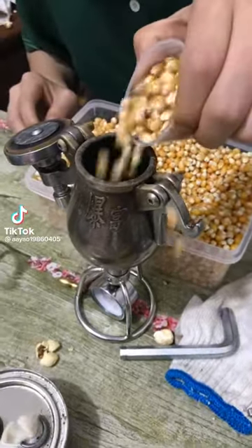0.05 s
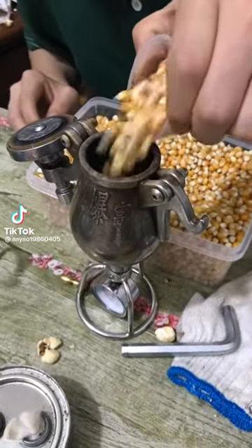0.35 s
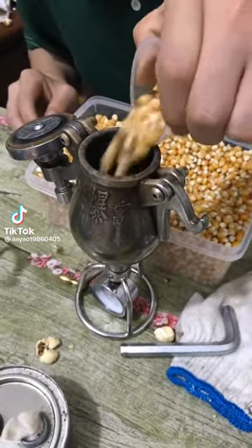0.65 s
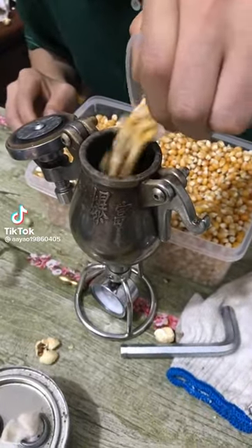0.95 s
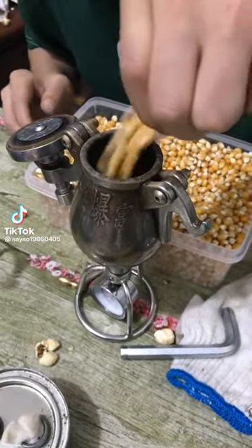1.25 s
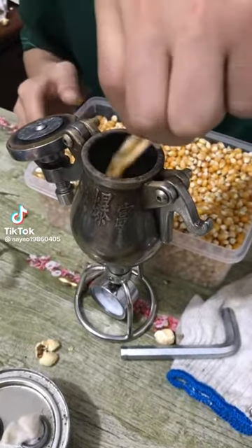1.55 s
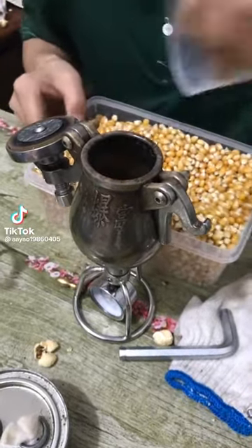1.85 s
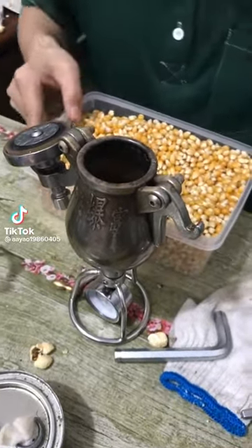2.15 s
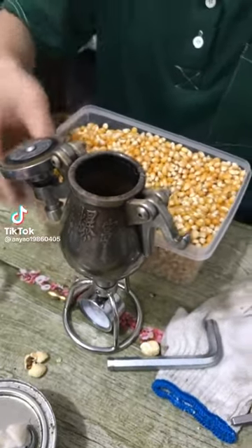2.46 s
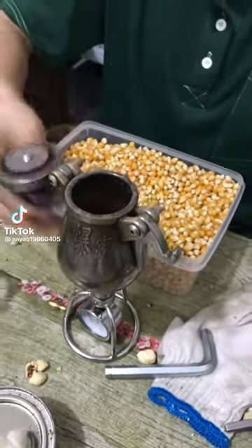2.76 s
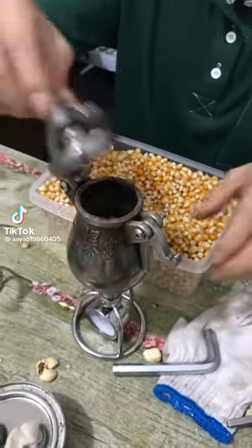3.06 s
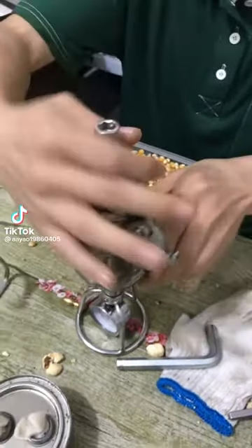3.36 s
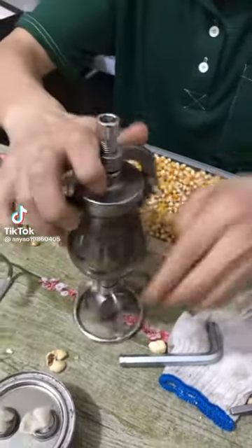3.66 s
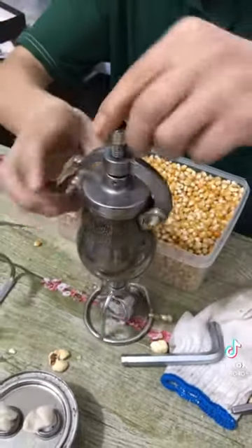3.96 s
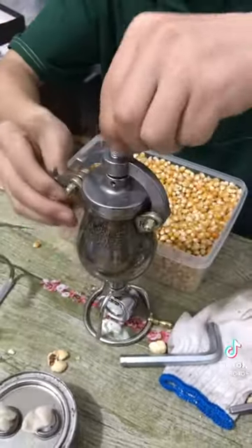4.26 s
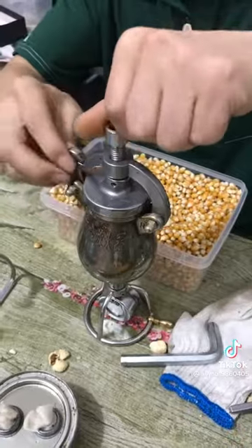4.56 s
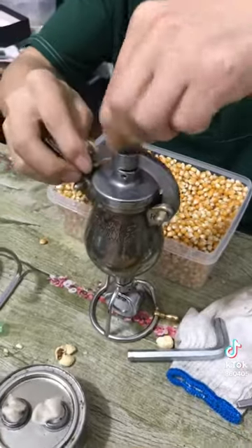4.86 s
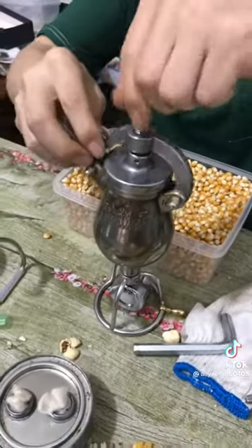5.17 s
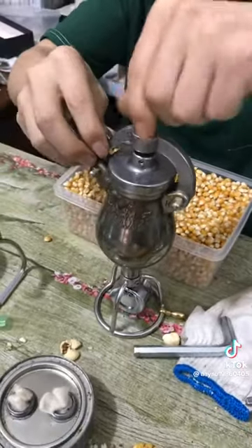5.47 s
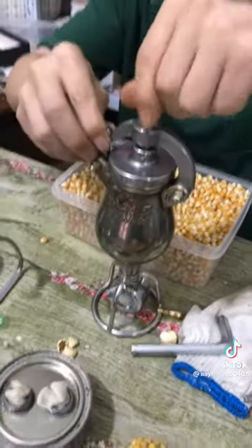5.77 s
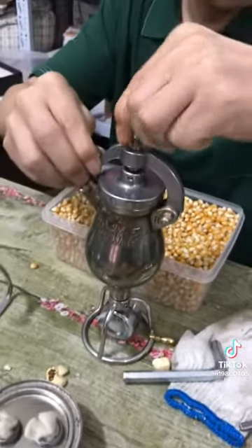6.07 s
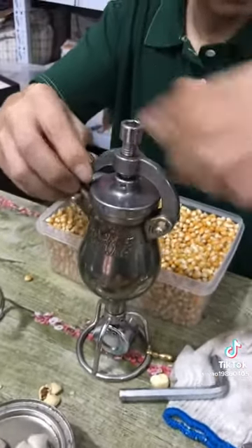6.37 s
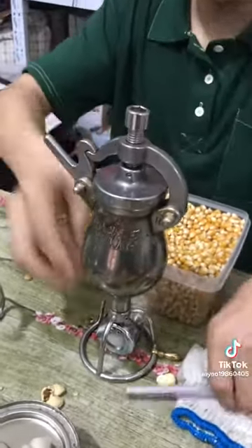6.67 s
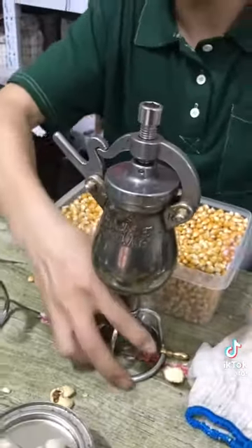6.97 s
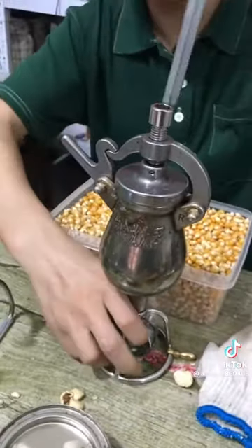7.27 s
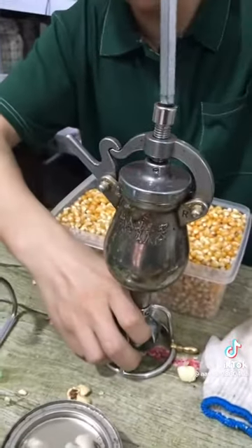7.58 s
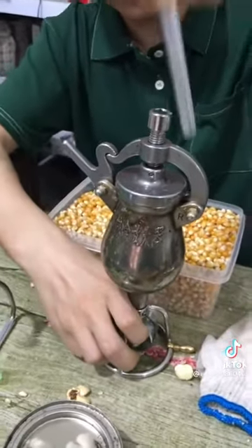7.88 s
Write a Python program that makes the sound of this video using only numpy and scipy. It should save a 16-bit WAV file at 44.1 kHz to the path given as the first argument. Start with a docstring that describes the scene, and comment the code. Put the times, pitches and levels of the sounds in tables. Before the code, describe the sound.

Dry corn kernels rattle into a small metal pot, then a scoop clatters down and a metal lid is clamped with clicks and scrapes.

```python
"""Corn pours from a scoop into a small cast-metal popping pot on a wooden table, in a small room.
Thousands of random impacts merge into a rattle that dulls as the heap grows. The scoop clatters down,
the hinged lid is swung shut and clamped, and its screw is run down by hand with a stick-slip rasp.
A steel hex key knocks on the table as it is picked up, and is worked into the screw head. Each blow
is a brief crack plus the struck body's damped modes; room air and a low mains hum lie under it all."""
import sys
import numpy as np
from scipy import signal
from scipy.fft import rfft, irfft
from scipy.io import wavfile

SR = 44100
rng = np.random.default_rng(int(sys.argv[2]) if len(sys.argv) > 2 else 0)


def wrap_up_sound(samples):
    """Save the sound to the file named by the first command line argument, as 16-bit audio."""
    columns = np.atleast_2d(samples).T
    # keep every value between -1 and 1, then stretch to whole-number steps
    tamed = np.clip(columns, -1, 1)
    steps = np.round(tamed * 32767).astype(np.int16)
    wavfile.write(sys.argv[1], SR, steps)


N = 349713
T = np.arange(N) / SR

# Spectrum of a small impact on the pot. Each row: frequency in Hz, spectral level in dB.
POT_IMPACT_TONE = [(76, -38.5), (130, -18), (400, -10), (638, -14), (1520, 3.5), (4150, -1), (4980, -6),
                   (6090, -0.5), (11800, -15.5), (16000, -41)]
# Modes of the pot and of its clamp. Each row: frequency in Hz, level in dB, T60 in seconds.
POT_MODES = [(1443, -1, 0.22), (2027, -3, 0.23), (3330, 13, 0.033), (4750, -13, 0.33), (5250, -4, 0.073),
             (8200, -15, 0.051), (11500, -18, .08)]
CLAMP_MODES = [(1126, -3.5, 0.16), (1170, -4.5, 0.18), (1844, 2.5, 0.11), (3064, -14.5, 0.17),
               (4580, 3.5, 0.053), (4565, -5, 0.15), (4650, 0.5, 0.055), (5540, 5, 0.032),
               (7180, -11.5, 0.042), (8860, -13.5, 0.084), (9720, -19.5, .07), (15100, -21, 0.055)]


def from_db(db):
    """Decibels to amplitude ratio."""
    return 10 ** (np.asarray(db) / 20)


def rms(x):
    """Root mean square."""
    return np.sqrt(np.mean(x ** 2) + 1e-20)


def at_hz(points, hz):
    """Interpolation on a log-frequency axis."""
    f, value = np.transpose(points)
    return np.interp(np.log(hz + 1e-9), np.log(f), value)


def band(x, low, high):
    """Causal band-pass filter."""
    return signal.sosfilt(signal.butter(3, [low, min(high, .48 * SR)], "band", fs=SR, output="sos"), x)


def colour(x, tone, size=4096):
    """Minimum-phase filtering imposes a spectrum with no sound ahead of its cause."""
    cepstrum = irfft(np.log(from_db(at_hz(tone, np.fft.rfftfreq(size, 1 / SR)))))
    cepstrum[1:size // 2] *= 2
    cepstrum[size // 2 + 1:] = 0
    return signal.oaconvolve(x, irfft(np.exp(rfft(cepstrum))))[:len(x)]


def decay(t, t60):
    """Exponential decay of 60 dB in t60 seconds."""
    return np.exp(-np.log(1000) * t / t60)


def wander(per_s):
    """Random modulation: ramps between Gaussian values."""
    knots = np.arange(0, T[-1] + 1, 1 / per_s)
    return np.interp(T, knots, rng.standard_normal(len(knots)))


def grains(per_s, spread_db=2.5):
    """Shot noise: random impulses of uneven size, with mean power independent of rate."""
    chance = per_s / SR
    at = np.flatnonzero(rng.random(N) < chance)
    sizes = from_db(spread_db * np.minimum(rng.exponential(1, len(at)), 3))
    clicks = np.zeros(N)
    clicks[at] = sizes * rng.choice([-1, 1], len(at))
    return clicks / np.sqrt(chance)


def ringing(modes, t, spread_db, detune):
    """Modal superposition: the contact point weights the modes, and the grip detunes them."""
    hz, db, t60 = np.transpose(modes)[:, :, None]
    strength = from_db(db + spread_db * rng.standard_normal(hz.shape))
    hz = hz * (1 + detune * rng.standard_normal(hz.shape))
    polarity = rng.choice([-1, 1], hz.shape)
    return np.sum(strength * polarity * np.sin(2 * np.pi * hz * t) * decay(t, t60), axis=0)


def impacts(rows, tone, modes, bass_db, crack_t60, ring_db, rise_s,
            edges_hz=(130, 700, 3000, 15000), attack_s=0.011):
    """Impulse response: a crack plus free vibration. Bass and brightness are relative to the mid band."""
    t = np.arange(SR // 4) / SR
    attack = int(attack_s * SR)
    swell = 1 - np.exp(-t / rise_s)   # the blow takes a moment to spread through the body
    out = np.zeros(N + len(t))
    for start_s, level_db, bright_db in rows:
        crack = colour(rng.standard_normal(len(t)) * swell * decay(t, crack_t60), tone)
        ring = swell * ringing(modes, t, spread_db=3, detune=.01)
        blow = crack / rms(crack[:attack]) + from_db(ring_db) * ring / rms(ring[:attack])
        at = int(start_s * SR)
        levels_db = level_db + bass_db, level_db, level_db + bright_db
        for low, high, db in zip(edges_hz, edges_hz[1:], levels_db):
            part = band(blow, low, high)
            out[at:at + len(t)] += from_db(db) * part / rms(part[:attack])
    return out[:N]


def stroke_envelope(rows, fade_t60):
    """Friction noise follows sliding speed: each stroke swells to a peak, then dies away."""
    return sum(from_db(db) * decay(np.abs(T - peak_s), np.where(T < peak_s, swell_s, fade_t60))
               for peak_s, db, swell_s in rows)


def friction(rows, tone, modes, ring_db, fade_t60):
    """Stick-slip friction: spurts of tiny slips rasp and drive the body's modes."""
    slips = grains(2000) * from_db(4 * wander(110))
    rasp = colour(slips, tone)
    body = ringing(modes, np.arange(SR // 3) / SR, spread_db=1, detune=0)
    ring = signal.oaconvolve(rasp, body)[:N]
    return stroke_envelope(rows, fade_t60) * (rasp / rms(rasp) + from_db(ring_db) * ring / rms(ring))


def corn_flow_db(stream_s=0.12, fullest_s=0.73, run_out_s=1.47):
    """Granular flow, in dB re its fullest: a thinning trickle, a growing stream, the scoop emptying."""
    tilt = np.clip((T - stream_s) / (fullest_s - stream_s), 0, 1)
    trickle_db = -6 - 60 * T
    stream_db = -4 * (1 - tilt)
    return np.where(T < stream_s, trickle_db, stream_db) - 102 * np.maximum(T - run_out_s, 0)


def collisions(per_s, t60, shapes):
    """A Poisson process of impacts, in which each kernel shape has its own click."""
    t = np.arange(SR // 20) / SR
    clicks = rng.standard_normal((shapes, len(t))) * decay(t, t60)
    hits = sum(signal.oaconvolve(grains(per_s / shapes), click)[:N] for click in clicks)
    return hits / rms(hits)


def pouring_corn(heap_from_s=.55, heap_grows_s=.55, bare_per_s=1100, heap_per_s=3000):
    """Dense impacts excite the pot; the growing heap damps the treble and strengthens the rattle."""
    # Spectra of the nearly empty and the filled pot. Each row: frequency in Hz, level in dB.
    empty_tone = [(200, -8.5), (520, -17), (870, -13.5), (1500, -2), (2000, -0.5), (2300, -6.5),
                  (4200, -1.5), (4950, -9.5), (5500, -1.5), (8000, -13), (12000, -19.5), (14000, -28),
                  (15100, -21)]
    full_tone = [(200, -13), (520, -22.5), (860, -24), (1070, -2.5), (1500, -7), (2080, -6.5), (2300, -12),
                 (3580, -4.5), (4950, -9.5), (5550, -1.5), (6640, -11), (10500, -21), (12200, -23),
                 (15500, -32)]
    flow_db = corn_flow_db()
    filled = np.clip((T - heap_from_s) / heap_grows_s, 0, 1)
    jostling = collisions(bare_per_s + (heap_per_s - bare_per_s) * filled, t60=0.014, shapes=5)
    bouncing = collisions(130, t60=.007, shapes=8)
    hits = jostling + from_db(-3) * bouncing
    empty, full = colour(hits, empty_tone), colour(hits, full_tone)
    rattle_db = -37 + flow_db + 2 * filled
    patter_db = -37 + 0.75 * flow_db - 3 * filled
    out = 0
    for low, high, db in ((150, 2600, rattle_db), (2600, 16000, patter_db)):
        early, late = band(empty, low, high), band(full, low, high)
        out += from_db(db) * ((1 - filled) * early / rms(early) + filled * late / rms(late))
    t = np.arange(SR // 4) / SR
    wall_modes = np.sin(2 * np.pi * 4690 * t) + from_db(-2) * np.sin(2 * np.pi * 5430 * t)
    wall = signal.oaconvolve(hits, wall_modes * decay(t, 0.087))[:N]
    return out + from_db(-50 + .5 * flow_db) * wall / rms(wall)


def air_and_hum(waver=.17, early_db=-3.5, steady_s=2.34, rise_s=1.0):
    """Broadband air noise and wavering mains harmonics; both come up a little as the pour ends."""
    # Air spectrum and hum partials. Each row: frequency in Hz, level in dB.
    air_tone = [(15, -29.5), (25, -17.5), (55, -8), (120, -27.5), (200, -25.5), (575, -38.5), (659, -35),
                (818, -36), (6560, -52), (16000, -70)]
    partials = [(49.9, -50), (150, -66.5)]
    air = colour(rng.standard_normal(N), air_tone)
    air = from_db(-53) * air / rms(band(air, 70, 16000))
    hum = sum(from_db(db) * np.sqrt(2) * np.sin(2 * np.pi * hz * T) for hz, db in partials)
    rise = from_db(early_db * np.clip((steady_s - T) / rise_s, 0, 1))
    return (air + hum * (1 + waver * wander(5.7))) * rise


def single_kernels():
    """Brief contacts of single kernels excite the pot's high modes."""
    # Each row: start in seconds, level in dB, brightness in dB.
    hits = [(0.1275, -28, 6), (0.193, -25, 4), (0.2394, -25.5, -10), (0.2833, -31, -6), (0.3177, -40, 5),
            (0.412, -27, 4), (0.4853, -34.5, 4), (0.5257, -42.5, 9.5), (0.5856, -47, 7),
            (0.6699, -29.5, 1.5), (1.836, -62.5, 7), (2.232, -44, -7)]
    return impacts(hits, POT_IMPACT_TONE, POT_MODES,
                   bass_db=-13.5, crack_t60=0.026, ring_db=-11.5, rise_s=0.00052)


def brushing_hands():
    """Friction of skin and sleeves: countless tiny slips sum to a soft rustle."""
    # Each row: peak time in seconds, level in dB, seconds to swell by 60 dB.
    strokes = [(1.96, -50.5, .6), (3.61, -48, 1.5), (3.98, -57, 0.39), (7.0, -58.5, 1)]
    # Each row: frequency in Hz, spectral level in dB.
    tone = [(240, -11), (500, -11), (1900, -11), (2700, -18.5), (3600, -18), (8500, -31), (15000, -45)]
    rustle = colour(grains(4500), tone)
    return stroke_envelope(strokes, fade_t60=1.3) * rustle / rms(rustle)


def falling_scoop():
    """Inelastic collisions: the scoop lands flat, bounces, tips over with a dry clack and skids."""
    # Each row: start in seconds, level in dB, brightness in dB.
    landing_hits = [(2.484, -11.5, -11.5), (2.5125, -16, -10), (2.579, -18.5, -7.5), (2.668, -28.5, -11.5),
                    (2.698, -17.5, -15.5), (2.7325, -19, -24), (2.756, -27.5, -8)]
    tipping_hits = [(2.825, -27, -9), (2.845, -29.5, -4), (2.869, -27.5, -6), (2.876, -20, -9),
                    (3.007, -40, -11)]
    # Each row: peak time in seconds, level in dB, seconds to swell by 60 dB.
    skid = [(2.895, -27.5, 0.02)]
    # Each row: frequency in Hz, spectral level in dB.
    landing_tone = [(76, -30), (130, -14), (228, -22.5), (356, -7), (410, -13.5), (829, -9.5), (1460, 1.5),
                    (2090, -21.5), (3460, -21), (4980, -30.5), (8070, -38.5), (16000, -70)]
    tipping_tone = [(130, -8.5), (350, 0), (700, -2), (1200, -4.5), (1800, -0.5), (2500, -13),
                    (3600, -10.5), (4700, -20), (5500, -24.5), (9000, -33), (16000, -54)]
    # Each row: frequency in Hz, level in dB, T60 in seconds.
    modes = [(371, -7, 0.072), (1086, 11.5, 0.16), (1483, 9, 0.084), (1518, 13, 0.084), (3400, -8, .14),
             (3560, -4, 0.097), (3758, -15, .14), (7830, -14, 0.066)]
    landing = impacts(landing_hits, landing_tone, modes,
                      bass_db=-7.5, crack_t60=0.029, ring_db=-8, rise_s=.0008)
    tipping = impacts(tipping_hits, tipping_tone, modes,
                      bass_db=-8.5, crack_t60=.03, ring_db=-21, rise_s=0.00053)
    return landing + tipping + friction(skid, tipping_tone, modes, ring_db=-13, fade_t60=0.34)


def table_thumps():
    """Structure-borne sound: hands jolt the pot, and the table's low modes radiate."""
    # Each row: start in seconds, level in dB, brightness in dB.
    jolts = [(3.245, -28, -5.5), (3.258, -27.5, -11), (3.342, -39.5, -3.5), (3.44, -34, -5),
             (3.511, -45, 8.5), (3.567, -37.5, -5), (3.669, -38.5, 2.5), (4.533, -39, -5),
             (5.295, -34.5, -9), (5.635, -34, -17), (5.678, -32, -8), (5.905, -37.5, -5.5)]
    # Each row: frequency in Hz, spectral level in dB.
    tone = [(50, 6), (130, -2), (390, -12), (800, -22.5), (1800, -29.5), (4000, -36.5)]
    # Each row: frequency in Hz, level in dB, T60 in seconds.
    modes = [(87.5, 0.5, 0.097), (145, -12, 0.085), (202.5, 2.5, 0.056), (251, -18, 0.18),
             (387.6, -8, 0.19)]
    return impacts(jolts, tone, modes, bass_db=-6.5, crack_t60=0.094, ring_db=-7.5, rise_s=0.0011,
                   edges_hz=(40, 80, 240, 4000), attack_s=0.023)


def lid_clamp():
    """Lid, hook and screw collide, and the metal rings in inharmonic modes."""
    # Each row: start in seconds, level in dB, brightness in dB.
    hits = [(3.2465, -34, -3), (3.255, -35.5, 6.5), (3.397, -47, -2.5), (3.6695, -35, 8.5),
            (4.099, -44, -5.5), (4.1155, -45.5, 14.5), (4.208, -45.5, 0), (4.398, -45.5, -8),
            (4.526, -40, 4.5), (4.537, -30, 3), (4.556, -37.5, -8), (4.581, -37, -7), (4.674, -43, -20),
            (4.698, -45, -5), (4.735, -32.5, -4), (5.296, -43.5, 4), (5.481, -44, 0)]
    # Each row: frequency in Hz, spectral level in dB.
    tone = [(76, -44), (130, -0.5), (402, -2), (735, -20), (1080, 0), (1610, -10), (1860, -4), (2360, -17),
            (4150, -12), (4680, -2.5), (5080, -9.5), (14800, -43), (16000, -55)]
    return impacts(hits, tone, CLAMP_MODES, bass_db=-5.5, crack_t60=0.022, ring_db=-3.5, rise_s=0.0023)


def turning_screw():
    """Stick-slip in the hand-turned screw drives the clamp's modes; then the thread ticks twice."""
    # Each row: peak time in seconds, level in dB, seconds to swell by 60 dB.
    turns = [(4.085, -51, 0.23), (4.26, -59, 0.43), (4.41, -52, 0.64), (4.81, -52, .5), (4.905, -46, 0.29),
             (5.288, -40, 0.23), (5.52, -51.5, 0.1), (5.59, -49.5, 0.37)]
    # Each row: frequency in Hz, spectral level in dB.
    tone = [(200, -5.5), (400, 1.5), (800, -9), (1130, 1.5), (1500, -8.5), (1900, -8), (2350, -19.5),
            (5000, -14.5), (6400, -24.5), (10000, -36), (14000, -50)]
    # Each row: start in seconds, level in dB, brightness in dB.
    ticks = [(5.769, -58.5, 0), (6.030, -61, 2)]
    rasp = friction(turns, tone, CLAMP_MODES, ring_db=-3.5, fade_t60=0.27)
    return rasp + impacts(ticks, POT_IMPACT_TONE, POT_MODES,
                          bass_db=-6, crack_t60=0.015, ring_db=-26.5, rise_s=0.00024)


def rocking_key(knock_s=6.714, first_gap_s=.024, gap_ratio=.72):
    """Inelastic contact: the hex key knocks on the table and rattles, each contact weaker and sooner."""
    # Each row: frequency in Hz, spectral level in dB.
    tone = [(76, -42), (130, -24), (315, -16), (356, -6), (735, -13.5), (1190, -10), (1750, -13),
            (2320, -30), (4410, -43), (16000, -75)]
    # Each row: frequency in Hz, level in dB, T60 in seconds.
    modes = [(369.5, 3.5, 0.18), (696, -14, .18), (822, -5, 0.14), (952, 4, .17), (1275, 7, 0.14),
             (1840, -6, 0.17), (4350, -20.5, .11)]
    contact = np.arange(6)
    times = knock_s + np.cumsum(np.r_[0, first_gap_s * gap_ratio ** contact[:-1]])
    level_db, bright_db = -15.5 - 4 * contact, -13 + 0.5 * contact
    return impacts(zip(times, level_db, bright_db), tone, modes,
                   bass_db=-2.5, crack_t60=0.032, ring_db=-7.5, rise_s=0.00057)


def key_in_socket():
    """Impact and friction excite the same modes: the key strikes the screw head, slides and drops in."""
    # Each row: start in seconds, level in dB, brightness in dB.
    hits = [(7.337, -16.5, -11.5), (7.857, -23.5, -14.5)]
    # Each row: peak time in seconds, level in dB, seconds to swell by 60 dB.
    slides = [(7.46, -52, .2), (7.538, -39.5, .08), (7.563, -36.5, 0.09), (7.583, -41, 0.039),
              (7.635, -40, 0.029), (7.825, -36, 0.13), (7.858, -31, 0.16)]
    # Each row: frequency in Hz, spectral level in dB.
    hit_tone = [(59, -20), (100, -7.5), (373, -3), (736, -15.5), (991, 0), (1520, -13.5), (2520, -1.5),
                (3320, -26), (4290, -13.5), (4980, -21), (6020, -22), (6420, -27.5), (11200, -45),
                (16000, -73)]
    slide_tone = [(200, -4.5), (730, -5.5), (1080, 5.5), (1400, -10), (2000, -14), (2550, -17),
                  (3250, -32.5), (4200, -23), (12000, -52)]
    # Each row: frequency in Hz, level in dB, T60 in seconds.
    modes = [(998, -2, 0.15), (1086, -2.5, 0.17), (1782, -5, 0.18), (1880, 7.5, 0.11), (2380, -10, 0.094),
             (2545, -3.5, 0.13), (2700, -4, 0.092), (4390, -16, 0.16), (5870, -4.5, 0.17), (11000, -22, .1)]
    clinks = impacts(hits, hit_tone, modes, bass_db=-5.5, crack_t60=0.026, ring_db=-12.5, rise_s=0.0006)
    return clinks + friction(slides, slide_tone, modes, ring_db=-7, fade_t60=0.096)


def room(x, delay_s=0.0042, build_s=0.0025):
    """Reverberation: diffuse reflections arrive late and decay at each band's own rate."""
    # Each row: frequency in Hz, T60 in seconds.
    reverb_times = [(100, 0.27), (260, 0.35), (700, 0.23), (1840, 0.37), (4850, 0.23), (12000, 0.23)]
    t = np.arange(SR // 2) / SR
    edges = np.geomspace(50, 18000, 9)
    tail = 0
    for low, high in zip(edges, edges[1:]):
        t60 = at_hz(reverb_times, np.sqrt(low * high))
        tail += band(rng.standard_normal(len(t)), low, high) * decay(t, t60)
    tail *= np.clip((t - delay_s) / build_s, 0, 1)
    return signal.fftconvolve(x, tail / np.sqrt(np.sum(tail ** 2)))[:N]


def scene():
    """Superposition of each source's direct sound and its share of the reverberant field."""
    corn = pouring_corn() + single_kernels()
    scoop = falling_scoop()
    lid = lid_clamp() + turning_screw()
    key = rocking_key()
    near = corn + lid + key_in_socket() + table_thumps() + brushing_hands()
    to_room = from_db(-10) * near + from_db(-6.5) * scoop + from_db(-5.5) * key
    return (near + scoop + key + room(to_room) + air_and_hum())[None]


def record(dry):
    """A steep elliptic low-pass removes the treble above 15.9 kHz."""
    return signal.sosfilt(signal.ellip(10, .2, 80, 15900, fs=SR, output="sos"), dry)


dry = scene()
out = record(dry)
wrap_up_sound(out)
```